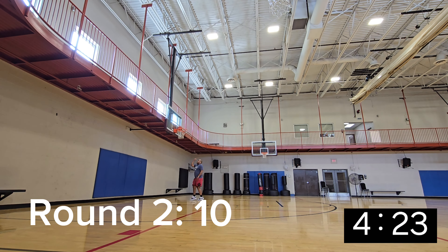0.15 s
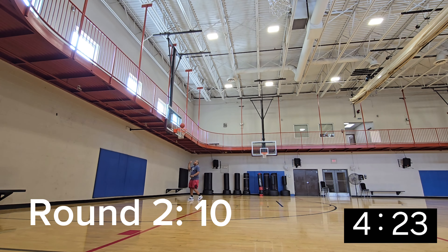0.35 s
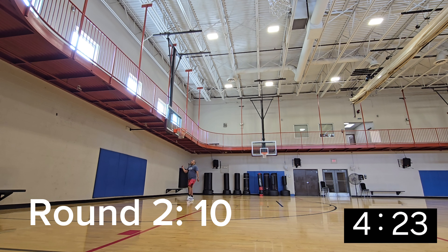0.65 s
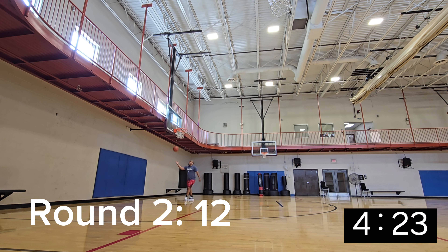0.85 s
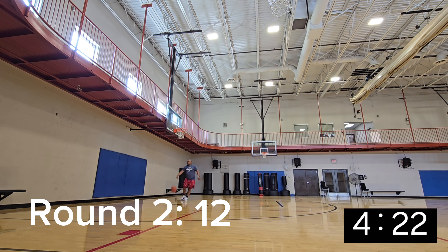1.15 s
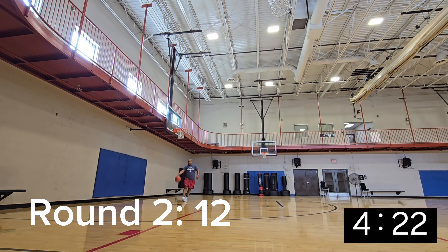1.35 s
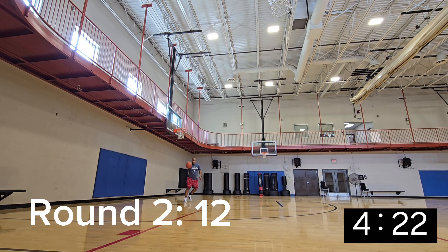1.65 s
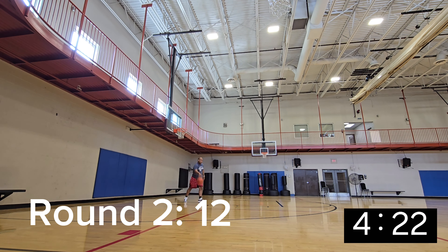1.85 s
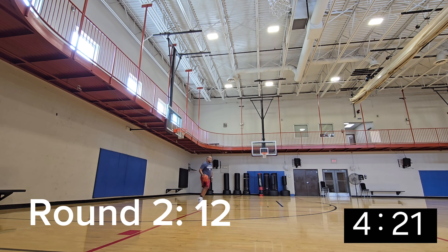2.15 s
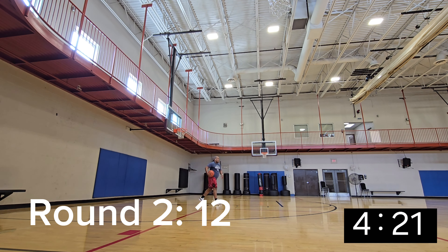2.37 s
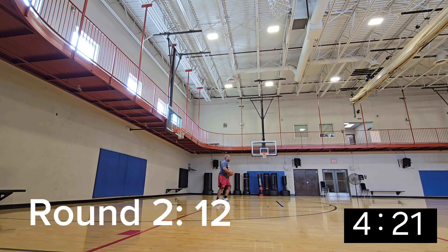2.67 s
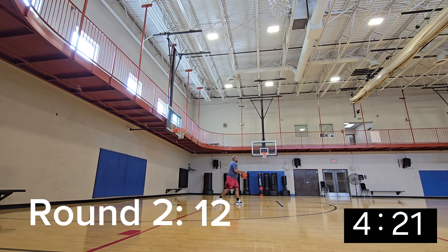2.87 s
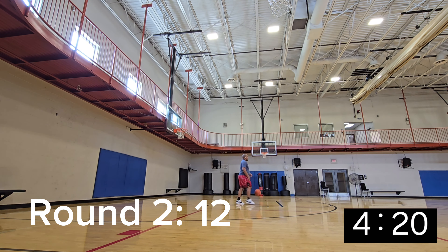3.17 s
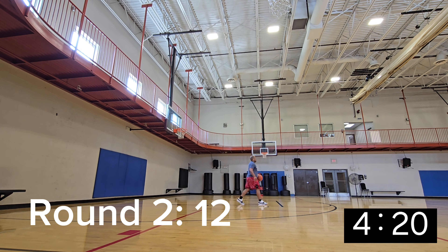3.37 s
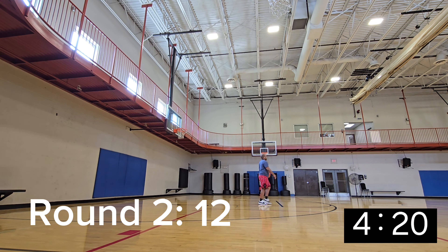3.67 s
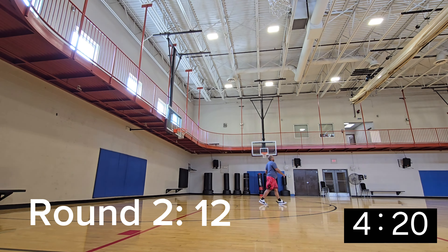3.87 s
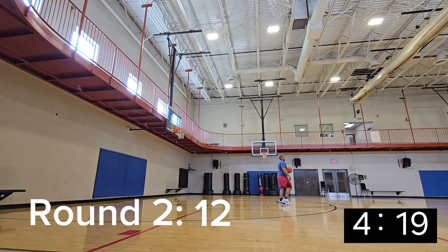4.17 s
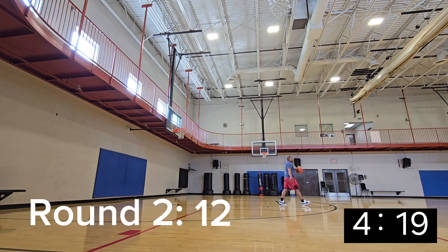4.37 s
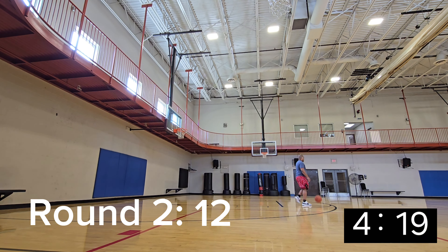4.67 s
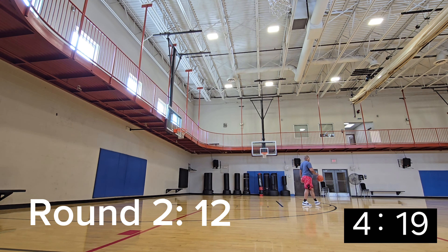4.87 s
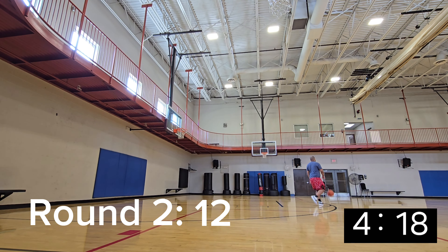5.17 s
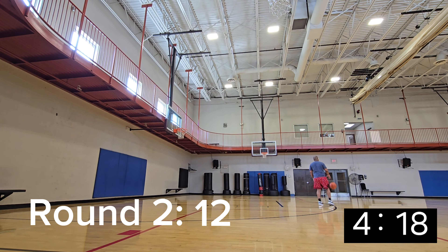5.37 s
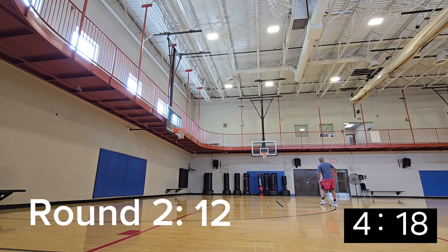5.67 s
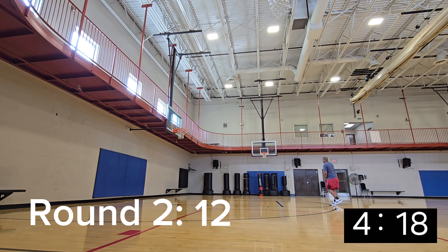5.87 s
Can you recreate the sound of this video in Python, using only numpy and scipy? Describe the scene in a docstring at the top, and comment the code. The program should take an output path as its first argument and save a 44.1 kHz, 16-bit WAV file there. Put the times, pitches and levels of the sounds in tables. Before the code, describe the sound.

In a reverberant gym with humming ventilation, a sneaker squeaks, a net swishes softly and a basketball is dribbled slowly away.

```python
"""A sneaker squeaks, a basketball swishes through the net, drops and is dribbled away to the right,
far down the court of a large, echoing gym. Each bounce is a slap of skin, a ring of the ball and a boom
of the sprung hardwood floor, thrown back by the walls. Rubber sticks and slips on varnish, cord and hands
brush the ball, the lone player lands with a thud. Air rushes through ducts; fans and lamps hum."""
import sys
import numpy as np
from scipy import signal
from scipy.fft import rfft, irfft, next_fast_len
from scipy.io import wavfile

SR = 44100
rng = np.random.default_rng(int(sys.argv[2]) if len(sys.argv) > 2 else 0)


def int16_out(signal):
    """Quantize to a 16-bit WAV file."""
    q = np.round(np.clip(np.atleast_2d(signal).T, -1, 1) * 32767)
    wavfile.write(sys.argv[1], SR, q.astype(np.int16))


N = 265482
SIZE = 2 ** 17   # samples per event
AGE_S, BINS_HZ = np.arange(SIZE) / SR, np.fft.rfftfreq(SIZE, 1 / SR)
LISTENER_M = 3.6   # from the left wall, as is wall_m

# sprung floor modes: f/Hz, level/dB, t60/s
SPRUNG_FLOOR = [(70, 0, 0.31), (125, -54, 0.037)]


def slap(snap_db, contact_s=0.00031, snap_s=0.00041):
    """The skin hits the boards in one steep pulse, crackles and sets the ball ringing."""
    # air and skin modes of the ball: f/Hz, level/dB, t60/s
    ball_modes = [(916, -16.5, 0.026), (1371, -29, 0.21), (2140, -35, 0.07), (5980, -8.5, 0.0017)]
    pulse = -np.exp(-AGE_S / contact_s)
    snap = from_db(snap_db) * rng.standard_normal(SIZE) * np.exp(-AGE_S / snap_s)
    return band(pulse + snap + ring(ball_modes), low_hz=130, high_hz=9300)


def bounce(wall_m, force_db, snap_db, boom_db, ping_db, loss_db_per_m=0.74, lead_ms_per_m=0.05):
    """Slap, board knock and floor boom, then the first reflections from the left."""
    # boards under the ball: f/Hz, level/dB, t60/s
    board_modes = [(204, -26, 0.041), (300, 5, 0.024), (387, -2.5, 0.096), (705, -13, 0.017)]
    crack = from_db(-0.5 + force_db - loss_db_per_m * wall_m) * slap(snap_db)
    knock = from_db(-26 + 0.4 * force_db) * ring(board_modes)
    direct = crack - knock + from_db(boom_db) * ring(SPRUNG_FLOOR)
    left_lead_s = lead_ms_per_m * (LISTENER_M - wall_m) / 1000
    out = np.zeros((2, SIZE))
    add(out[0], direct, max(-left_lead_s, 0))
    add(out[1], direct, max(left_lead_s, 0))
    nearby_echo = from_db(-2.5) * band(crack, low_hz=1200, high_hz=16000)
    add(out[0], nearby_echo, t_s=0.0024)
    wall_echo = scattered(band(crack, low_hz=393, high_hz=6700), spread_s=0.0074)
    wall_s = 0.005 + 0.0025 * wall_m
    add(out, panned(6.5) * wall_echo, wall_s)
    add(out, panned(6.5) * balcony_ping(ping_db), wall_s + 0.005)
    return out


def balcony_ping(db, hz=2030, t60_s=0.01):
    """The balcony's ribbed underside returns the slap as a short ping."""
    return scattered(ring([(hz, db, t60_s)]), spread_s=0.0032)


def bounce_tail(wall_m, force_db):
    """Hall reverberation: a soft bounce keeps more knock; the bass builds more slowly from mid-court."""
    # bounce energy fed to the hall: f/Hz, density/dB
    spectrum = [(25, -44), (45, -48.5), (68, -33), (115, -36), (180, -51.5), (350, -52), (750, -67),
                (1380, -60), (1750, -64), (2150, -64), (2700, -69), (4200, -72.5), (8000, -80.5),
                (10300, -85), (12500, -82.5), (15500, -82.5)]
    # share of the force each band follows: f/Hz, share
    force_share = [(70, 0.6), (140, 0.48), (240, 0.23), (560, 1)]
    # colour shift as the ball moves right: f/Hz, slope/(dB/m)
    court_colour = [(250, -0.22), (560, -1.13), (1400, 0.7), (2200, 0), (3800, 0.07), (12000, -0.6)]
    colour_db = at_hz(force_share, BINS_HZ) * force_db
    colour_db += at_hz(court_colour, BINS_HZ) * (wall_m - LISTENER_M)
    return hall(spectrum, build_s=0.0036, bass_build_s=0.0048 * wall_m, colour_db=colour_db)


def rolling_boom(force_db, first_s, first_db, trip_s=0.195, trip_loss_db=3):
    """The floor's boom returns twice from the walls, then once from the far end."""
    boom = band(ring(SPRUNG_FLOOR), low_hz=78, high_hz=166)
    out = np.zeros(SIZE)
    for trip in range(2):
        add(out, from_db(first_db - trip_loss_db * trip) * boom, first_s + trip_s * trip)
    add(out, from_db(force_db - 10.5) * boom, t_s=0.48)
    return out


def squeak(length_s, pitch_hz, glide_hz, db, octave_db, direct_db, echo_db, settle_s=0.0113, jitter_hz=62):
    """Rubber sticks and slips unevenly on varnish, slowing as the sole takes weight."""
    age_s = AGE_S[:int(length_s * SR)]
    jitter = band(rng.standard_normal(SR), low_hz=50, high_hz=200, order=2)
    slip_hz = pitch_hz + glide_hz * np.exp(-age_s / settle_s)
    slip_hz += jitter_hz * jitter[-len(age_s):] / jitter.std()
    phase = 2 * np.pi * np.cumsum(slip_hz) / SR
    tone = np.sin(phase) + from_db(octave_db) * np.sin(2 * phase)
    tone *= 2 * from_db(db) * signal.windows.tukey(len(age_s), 0.5)
    out = in_hall(tone, direct_db, build_s=0.0024)
    add(out, from_db(echo_db) * tone, t_s=0.1)   # end wall
    return out


def brush(length_s, db):
    """Cord or skin drags over the pebbled ball in a swell of tiny ticks."""
    # friction spectrum: f/Hz, density/dB
    spectrum = [(300, -19), (1200, 8), (3500, -4), (7000, -2.5), (10000, -10.5), (15500, -6)]
    count = int(length_s * SR)
    ticks = rng.standard_normal(count) * from_db(2 * rng.exponential(1, count))
    hz = np.fft.rfftfreq(count, 1 / SR)
    hiss = irfft(rfft(ticks) * from_db(at_hz(spectrum, hz)), count)
    swell = from_db(db) * hiss / hiss.std() * np.hanning(count)
    return in_hall(swell, direct_db=0, build_s=0.0034)


def footfall(db):
    """A foot lands from the jump shot, heard only as the hall's low thud."""
    # thud spectrum: f/Hz, density/dB
    spectrum = [(25, -66), (58, -21), (100, -38), (200, -50), (800, -55.5), (5000, -90)]
    return from_db(db) * hall(spectrum, build_s=0.011, bass_build_s=0.008)


def ventilation(air_rms_db=-34):
    """Steady rush of air through ringing ducts, with the hum of fans and lamps."""
    # air rush: f/Hz, density/dB
    spectrum = [(13, -34), (24, -8), (45, -1.5), (60, 2.5), (88, -6), (115, 1), (150, -10), (270, -14.5),
                (380, -19), (650, -13.5), (900, -20), (2100, -25.5), (4200, -32.5), (6300, -43.5),
                (10000, -53.5), (16000, -65)]
    # duct resonances: f/Hz, width/Hz, boost/dB
    duct_modes = [(169.6, 8.6, 4), (341.6, 13, 4), (356.5, 32, 10), (406, 46, 8), (466.7, 24, 7.5),
                  (597, 4.6, 8), (1300, 480, 3.5)]
    # fan and lamp hum: f/Hz, rms level/dB
    hum_tones = [(59, -40), (120, -49.5)]
    size = next_fast_len(N + SR, True)
    hz = np.fft.rfftfreq(size, 1 / SR)
    ducts_db = sum(db / (1 + (2 * (hz - centre) / width) ** 2) for centre, width, db in duct_modes)
    air = irfft(diffuse(spectrum, size) * from_db(ducts_db))[:, :N]
    t_s = np.arange(N) / SR
    hum = sum(np.sqrt(2) * from_db(db) * np.sin(2 * np.pi * (f_hz * t_s + rng.random()))
              for f_hz, db in hum_tones)
    return from_db(air_rms_db) * air / air.std() + hum


def hall(spectrum, build_s, bass_build_s, colour_db=0, bass_hz=300):
    """Dense echoes build up, the bass last, then die band by band; air absorbs the treble first."""
    # reverberation time: f/Hz, t60/s
    decay = [(30, 1.9), (70, 3.45), (150, 2.53), (350, 2.22), (800, 4.74), (1700, 3.64), (3500, 3.8),
             (6300, 1.82), (10000, 1.09), (16000, 0.32)]
    field = diffuse(spectrum) * from_db(colour_db)
    centres_hz, out = np.array(decay)[:, 0], 0
    for share, (centre_hz, t60_s) in zip(np.eye(len(decay)), decay):
        noise = irfft(field * at_hz(np.c_[centres_hz, share], BINS_HZ))
        rise_s = build_s + bass_build_s / (1 + (centre_hz / bass_hz) ** 2)
        out += noise * from_db(-60 * AGE_S / t60_s) * (1 - np.exp(-AGE_S / rise_s))
    return out


def in_hall(sound, direct_db, build_s):
    """A short sound plus its reverberation."""
    tail = hall([(20, 0), (20000, 0)], build_s, bass_build_s=0)
    tail /= np.sqrt(np.sum(tail ** 2) / 2)
    response = 2 * tail + from_db(direct_db) * (AGE_S == 0)
    return signal.fftconvolve(response, sound[None], axes=1)


def scattered(sound, spread_s):
    """A rough surface returns a quick cluster of copies, different in each ear."""
    age_s = AGE_S[:SR // 20]
    cluster = rng.standard_normal((2, len(age_s))) * np.exp(-age_s / spread_s)
    cluster /= np.linalg.norm(cluster, axis=1, keepdims=True)
    return signal.fftconvolve(cluster, sound[None], axes=1)[:, :SIZE]


def diffuse(spectrum, size=SIZE):
    """Spectrum of noise from all sides: alike in both ears in the bass, unrelated in the treble."""
    # likeness of the ears: f/Hz, correlation
    correlation = [(60, 0.96), (125, 0.86), (260, 0.85), (500, 0.52), (1000, -0.3), (2000, 0.04),
                   (12000, -0.059)]
    # balance: f/Hz, left minus right/dB
    balance = [(60, 0.1), (250, -0.6), (500, 0.5), (1000, 2.5), (4000, 1), (12000, 1)]
    hz = np.fft.rfftfreq(size, 1 / SR)
    mid, side = rfft(rng.standard_normal((2, size))) * np.sqrt(SR) / 2
    alike = at_hz(correlation, hz)
    ears = np.sqrt(1 + alike) * mid + np.sqrt(1 - alike) * side * [[1], [-1]]
    return ears * panned(at_hz(balance, hz)) * from_db(at_hz(spectrum, hz))


def ring(modes):
    """Damped sines of a struck body."""
    return sum(from_db(db - 60 * AGE_S / t60_s) * np.sin(2 * np.pi * hz * AGE_S) for hz, db, t60_s in modes)


def band(x, low_hz, high_hz, order=1):
    """Causal band-pass."""
    sos = signal.butter(order, [low_hz, high_hz], "band", fs=SR, output="sos")
    return signal.sosfilt(sos, x + 1e-18)


def from_db(db):
    """Decibels to gain."""
    return 10 ** (np.asarray(db) / 20)


def at_hz(points, hz):
    """Interpolate a table over log frequency."""
    known_hz, values = np.transpose(points)
    return np.interp(np.log(np.maximum(hz, 1)), np.log(known_hz), values)


def panned(db):
    """Ear gains for a left-minus-right level."""
    return from_db(np.array([[0.5], [-0.5]]) * db)


def add(out, sound, t_s):
    """Mix a sound in at t_s."""
    start = round(t_s * SR)
    part = sound[..., :max(out.shape[-1] - start, 0)]
    out[..., start:start + part.shape[-1]] += part


def scene():
    """Ball, shoes and net over the ventilation."""
    # ball on the floor: t/s, from left wall/m, force/dB, snap/dB, boom/dB, ping/dB,
    # delay of first boom echo/s, its gain/dB
    bounces = [(1.234, 1.74, 1.5, -28, -11, -28, 0.14, -11), (1.983, 2.3, -1, -7.5, -13, -5.5, 0.0465, -5),
               (3.133, 4.6, -6.5, -5, -19, -23, 0.12, -13), (4.6850, 6.5, -3, -5.5, -20.5, -21, 0.1, -9),
               (5.268, 7.3, -3.5, -12.5, -15, -24, 0.12, -13)]
    # sole slips: t/s, length/s, settled f/Hz, glide/Hz, gain/dB, octave/dB, direct/dB, end wall echo/dB
    squeaks = [(0.2, 0.044, 6208, 300, -31.5, -15, -4, -29), (0.206, 0.033, 6930, 100, -60, -5, 1, -22),
               (.228, .035, 7460, 300, -51.5, -11, 0, -22), (5.55, 0.021, 6395, 40, -46.5, -22, 6, -1)]
    # ball against net and hands: t/s, length/s, gain/dB
    brushes = [(0.574, 0.065, -44), (1.002, 0.046, -57)]
    # landing: t/s, gain/dB
    footfalls = [(.53, -18.5), (0.741, -30.5)]
    out = ventilation()
    for t_s, wall_m, force_db, snap_db, boom_db, ping_db, echo_s, echo_db in bounces:
        add(out, bounce(wall_m, force_db, snap_db, boom_db, ping_db), t_s)
        add(out, bounce_tail(wall_m, force_db), t_s)
        add(out, rolling_boom(force_db, echo_s, echo_db), t_s)
    for t_s, *slip in squeaks:
        add(out, panned(2) * squeak(*slip), t_s)
    for t_s, length_s, db in brushes:
        add(out, brush(length_s, db), t_s)
    for t_s, db in footfalls:
        add(out, footfall(db), t_s)
    return out


def record(dry):
    """Steep low-pass at 16 kHz."""
    return signal.sosfilt(signal.ellip(10, 0.1, 90, 16000, fs=SR, output="sos"), dry)


dry = scene()
out = record(dry)
int16_out(out)
```